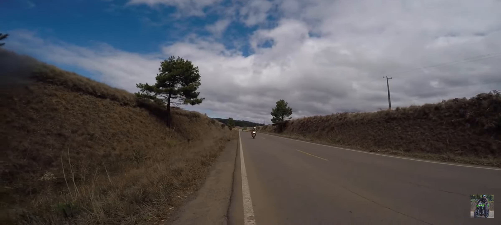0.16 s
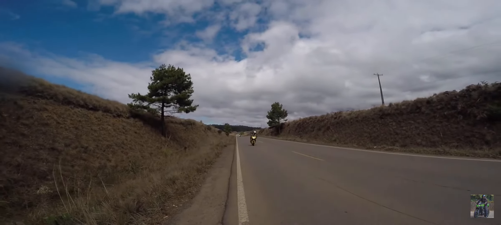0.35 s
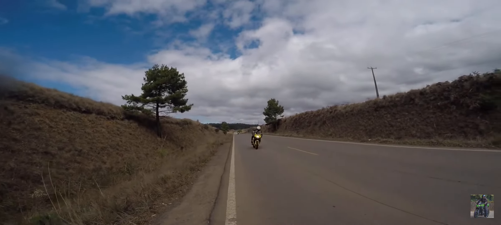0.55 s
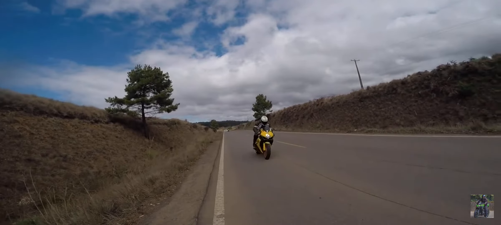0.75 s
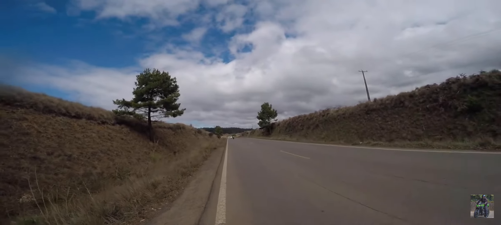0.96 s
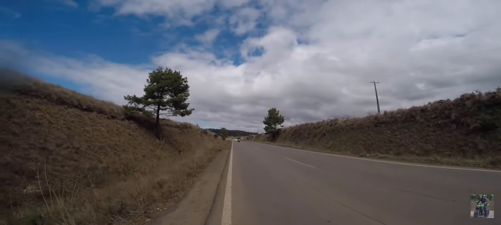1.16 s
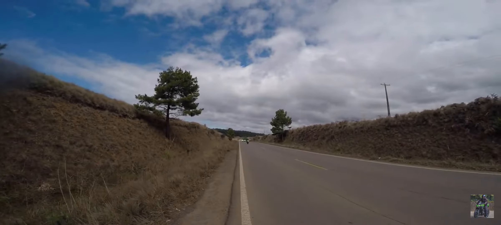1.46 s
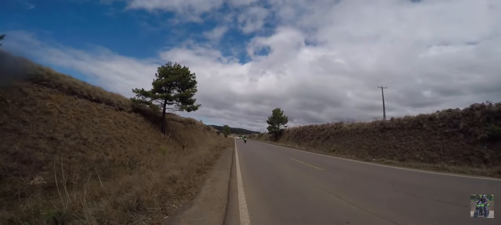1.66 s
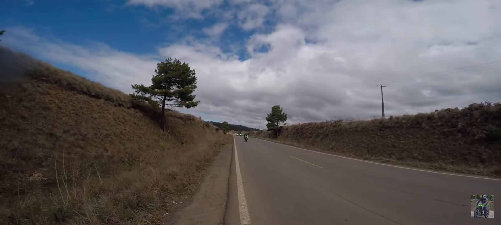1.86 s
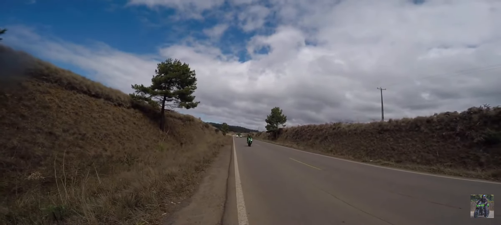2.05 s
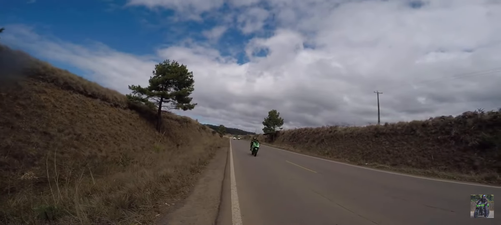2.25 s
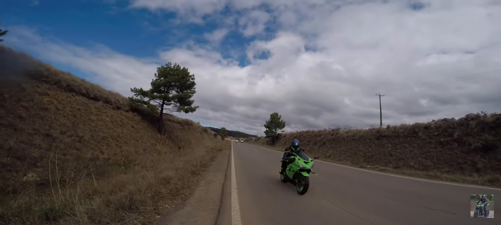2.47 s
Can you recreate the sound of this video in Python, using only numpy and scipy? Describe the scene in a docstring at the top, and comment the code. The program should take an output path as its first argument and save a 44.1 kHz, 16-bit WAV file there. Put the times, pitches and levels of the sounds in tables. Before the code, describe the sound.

A high-revving sport motorcycle approaches over light wind and faint low hum, swelling to a hard bark as it passes very close at 1 s. Its pitch drops and its wake buffets the microphone until about 1.3 s. It drones away, with a tiny tick near 1.6 s, its note falling around 2.3 s. A second motorcycle screams closer, cut off on arrival at 2.6 s. Right side dominates; left is dull.

```python
"""A first sport motorcycle nears on an open country road amid wind and a faint low hum, and barks by at 1 s.
Its wake rumbles on the microphones; it drones away, a tiny tick sounds, and its note drops near the end.
Meanwhile a second one screams up behind, rising in pitch and level until the sound ends as it arrives.
Each machine sums multiples of its crank speed with puffing noise, shaped by distance, angle and Doppler.
The right channel rides a gain control; the left is quiet and dull."""
import sys
import numpy as np
from scipy import signal
from scipy.fft import rfft, irfft
from scipy.io import wavfile

SR = 44100
rng = np.random.default_rng(int(sys.argv[2]) if len(sys.argv) > 2 else 0)


def pcm_store(signal):
    """Save signal as 16-bit PCM."""
    levels = np.round(np.clip(np.atleast_2d(signal), -1, 1) * 32767)
    wavfile.write(sys.argv[1], SR, levels.astype(np.int16).T)


N = 115101
T = np.arange(N) / SR
HZ = np.maximum(np.fft.rfftfreq(N, 1 / SR), 1)
SOUND_M_PER_S = 343


def from_db(db):
    """Decibels to gain."""
    return 10 ** (np.asarray(db) / 20)


def colour(hz, db):
    """Gain at every frequency, interpolated in dB over log frequency."""
    return from_db(np.interp(np.log(HZ), np.log(hz), db))


def noise(hz, db_per_hz):
    """Gaussian noise with the given level per Hz."""
    shaped = irfft(rfft(rng.standard_normal(N)) * colour(hz, db_per_hz), N)
    return shaped * np.sqrt(SR / 2)


def drift(rate_hz):
    """Slow random wander with zero mean and unit spread."""
    slow = irfft(rfft(rng.standard_normal(N)) / (1 + (HZ / rate_hz) ** 2), N)
    return (slow - slow.mean()) / slow.std()


def smooth(x, seconds):
    """One-pole smoothing."""
    pole = np.exp(-1 / (seconds * SR))
    return signal.lfilter([1 - pole], [1, -pole], x)


def bump(centre_s, half_width_s):
    """Gaussian bell of height 1 in time, down to 1/e at the half width."""
    return np.exp(-((T - centre_s) / half_width_s) ** 2)


def hum():
    """Faint low tones whose phases waver slowly."""
    # Each row: frequency in Hz, RMS level in dB.
    hum_tones = [(30, -71), (60, -62), (120, -66)]
    total = 0
    for hz, db in hum_tones:
        phase = 2 * np.pi * hz * T + 0.34 * drift(2.2)
        total = total + np.sqrt(2) * from_db(db) * np.sin(phase)
    return total


def wind():
    """Steady air noise plus gusts of low-passed noise; the strongest is the first machine's wake."""
    # Each row: frequency in Hz, level in dB per Hz.
    wind_spectrum = [(20, -76.5), (60, -80.5), (130, -79), (250, -85), (500, -83), (800, -90.5),
                     (1500, -103), (2300, -109), (3200, -109), (4000, -115), (5000, -115), (6500, -123),
                     (10000, -133), (13000, -145)]
    # Each row: centre in seconds, level of the low-passed noise in dB over the wind, half width in seconds.
    gusts = [(.14, -3.5, .08), (.5, 4.5, 0.038), (1.01, 18, .045), (1.17, 11, 0.17), (2.15, 4, .2)]
    gust_top_hz = 104
    hz, db_per_hz = np.transpose(wind_spectrum)
    air = noise(hz, db_per_hz)
    lowpass = signal.butter(2, gust_top_hz, fs=SR, output="sos")
    rumble = signal.sosfilt(lowpass, noise(hz, db_per_hz))
    gust_gain = sum(from_db(db) * bump(centre_s, width_s) for centre_s, db, width_s in gusts)
    return air + rumble * gust_gain


def tick():
    """A tiny bright tick: band-passed noise with an abrupt start and exponential decay."""
    start_s, decay_s = 1.577, .0012
    level_before_filter_db = -62
    envelope = (T > start_s) * np.exp(-np.abs(T - start_s) / decay_s)
    burst = rng.standard_normal(N) * envelope
    band = signal.butter(2, [5500, 10500], "band", fs=SR, output="sos")
    return from_db(level_before_filter_db) * signal.sosfilt(band, burst)


def path(abreast_s, speed_m_per_s, closest_m):
    """Distance (m), angle from the nose (deg) and Doppler ratio of a straight steady pass, as heard."""
    sent_s = np.linspace(-4, 4, 8001)
    extra_m = np.hypot(speed_m_per_s * sent_s, closest_m) - closest_m
    heard_s = sent_s + extra_m / SOUND_M_PER_S
    along_m = speed_m_per_s * np.interp(T - abreast_s, heard_s, sent_s)
    distance_m = np.hypot(along_m, closest_m)
    angle_deg = np.degrees(np.arccos(-along_m / distance_m))
    receding_m_per_s = speed_m_per_s * along_m / distance_m
    return distance_m, angle_deg, 1 / (1 + receding_m_per_s / SOUND_M_PER_S)


def exhaust_note(turn_rad, facing, orders, fades, waver_db, smear_rad, sweep_rad):
    """Cosines at every multiple of crank speed, each with its own directivity, waver and fades."""
    multiples, *views_db = np.transpose(orders)
    multiples = np.round(multiples)
    note = 0
    for k in range(1, int(multiples[-1]) + 1):
        db = np.array([np.interp(k, multiples, view) for view in views_db]) @ facing
        db = db + waver_db * drift(6.3)
        for centre_s, multiple, change_db, width_s in fades:
            if round(multiple) == k:
                db = db + change_db * bump(centre_s, width_s)
        phase = k * turn_rad - smear_rad * np.log(k) + sweep_rad * max(k - 6, 0) ** 2
        note = note + np.sqrt(2) * from_db(db) * np.cos(phase)
    return note


def roar(turn_rad, facing, distance_m, spectrum, chop, roar_db, hiss_db):
    """Gas, tyre and air noise puffing twice per crank turn, strong and weak; its top fades faster afar."""
    hiss_above_hz, hiss_loss_db_per_m = 3060, .5
    hz, *views_db = np.transpose(spectrum)
    rush = sum(np.sqrt(share) * noise(hz, view) for share, view in zip(facing, views_db))
    hiss = irfft(rfft(rush) / (1 + (hiss_above_hz / HZ) ** 4), N)
    hiss_gain = from_db(hiss_db - hiss_loss_db_per_m * distance_m)
    rush = rush + hiss * (hiss_gain - 1)
    puffs = np.exp(chop * (np.cos(2 * turn_rad) + np.cos(turn_rad) / 2))
    return from_db(roar_db) * rush * puffs / np.sqrt(np.mean(puffs ** 2))


def motorcycle(route, drive, angles_deg, orders, roar_spectrum, fades, jitter_rad, shake, waver_db,
               smear_rad, sweep_rad, chop, roar_db, hiss_db):
    """Exhaust note and roar locked to one Doppler-shifted crank angle, falling off as 1/distance."""
    distance_m, angle_deg, doppler = route
    s, crank_hz, level_db = np.transpose(drive)
    heard_hz = np.interp(T, s, crank_hz) * doppler
    turn_rad = 2 * np.pi * np.cumsum(heard_hz) / SR + jitter_rad * drift(60)
    # share of each described direction in the present view
    facing = np.array([np.interp(angle_deg, angles_deg, row) for row in np.eye(len(angles_deg))])
    note = exhaust_note(turn_rad, facing, orders, fades, waver_db, smear_rad, sweep_rad)
    note = note * (1 + shake * drift(70))
    rush = roar(turn_rad, facing, distance_m, roar_spectrum, chop, roar_db, hiss_db)
    return from_db(np.interp(T, s, level_db)) * (note + rush) / distance_m


def second_motorcycle():
    """The pursuer: crank speed and level climb as it closes in, its treble stronger."""
    # Each row: time in seconds, crank speed in Hz, level of the whole machine in dB.
    drive = [(0, 85.4, -30.5), (1.2, 90.3, -19), (1.45, 90.9, -13.5), (1.621, 94.25, -14),
             (1.73, 95.72, -8), (1.901, 98.06, -3.5), (1.999, 99.3, -4), (2.201, 101.9, -0.5),
             (2.33, 103.8, 2.5), (2.46, 105.5, 1), (2.55, 105.4, -2), (2.61, 107.6, -3)]
    # Each row: multiple of crank speed, then dB at 1 m from each angle, before the drive level.
    orders = [(1, -40, -60.5), (2, -32, -39), (3, -43, -55.5), (4, -7.5, -13), (5, -40.5, -34),
              (6, -34, -53), (7, -41.5, -45), (8, -18, -21.5), (9, -40, -39.5), (10, -23, -32),
              (11, -52.5, -38.5), (12, -41, -32), (13, -44, -47), (14, -37.5, -55), (15, -46, -48),
              (16, -37.5, -44), (18, -48, -52), (20, -60, -77), (23, -45, -55), (27, -50.5, -55.5),
              (31, -57, -58), (33, -50, -55), (36, -67.5, -56.5), (42, -57, -55), (48, -65.5, -67)]
    # Each row: frequency in Hz, then dB per Hz at 1 m from each angle, before drive, roar and hiss gains.
    roar_spectrum = [(60, -50.5, -53.5), (250, -54, -62.5), (795, -65.5, -57.5), (1550, -72.5, -59.5),
                     (2280, -77.5, -67.5), (3160, -68, -77.5), (3900, -72, -73.5), (4900, -73, -73.5),
                     (6500, -81.5, -84.5), (10000, -87.5, -96), (13000, -106, -100)]
    # Each row: centre in seconds, multiple of crank speed, change in dB, half width in seconds.
    fades = [(2.262, 24, 11.5, 0.049), (2.12, 10, 2, 0.072), (2.4, 16, -8, .12), (2.36, 10, -5.5, 0.13),
             (2.37, 29, 16, 0.034), (2.38, 8, -6, .035), (2.48, 8, 8, 0.044), (2.52, 12, 11, 0.022),
             (2.545, 8, -14, 0.0094), (2.527, 4, -18, .02)]
    route = path(abreast_s=2.635, speed_m_per_s=33.0, closest_m=1.7)
    return motorcycle(route, drive, (9.1, 44.5), orders, roar_spectrum, fades,
                      jitter_rad=.004, shake=0.018, waver_db=1.8, smear_rad=0.72, sweep_rad=.4,
                      chop=0.067, roar_db=-2.0, hiss_db=3.5)


def first_motorcycle():
    """The leader: steady road speed past the microphones, crank speed falling near the end."""
    # Each row: time in seconds, crank speed in Hz, level of the whole machine in dB.
    drive = [(0, 88.2, -7), (.28, 89.32, -4), (.42, 89.74, -3), (.7, 90.7, 1.5), (.9, 91.06, 0.5),
             (.995, 90.45, -0.5), (1.05, 90.96, -5.5), (1.13, 90.8, -2), (1.3, 91.1, -1),
             (1.451, 90.77, 1.5), (1.699, 91.15, -1), (2.1, 91.42, -1), (2.21, 93.42, -1.5),
             (2.299, 90.7, 2.5), (2.39, 82.46, -1.5), (2.61, 82.4, -16)]
    # Each row: multiple of crank speed, then dB at 1 m from each angle, before the drive level.
    orders = [(1, -30, -34, -33), (2, -13.5, -10.5, -14), (3, -34.5, -42, -44.5), (4, -19.5, -29, -24),
              (5, -25, -40.5, -34), (6, -22.5, -18.5, -28), (7, -31.5, -38, -43), (8, -21.5, -16, -35.5),
              (9, -34, -38, -54), (10, -31.5, -30, -42.5), (11, -39.5, -38, -53), (12, -36.5, -35, -47),
              (13, -52.5, -46, -56), (14, -44.5, -38.5, -45), (16, -61, -46.5, -63.5), (18, -55, -48, -60),
              (21, -58.5, -53.5, -70.5)]
    # Each row: frequency in Hz, then dB per Hz at 1 m from each angle, before drive, roar and hiss gains.
    roar_spectrum = [(60, -53.5, -59, -63), (253, -61, -57, -56), (830, -58.5, -56, -75.5),
                     (1070, -60.5, -52, -71), (1450, -71.5, -62, -81.5), (2130, -74, -67.5, -81.5),
                     (2270, -83, -71.5, -86.5), (3230, -74.5, -82, -89), (3900, -85, -75.5, -90),
                     (4800, -81.5, -80, -98.5), (6300, -96, -91, -103), (10200, -102, -102, -114),
                     (13000, -118, -120, -125)]
    # Each row: centre in seconds, multiple of crank speed, change in dB, half width in seconds.
    fades = [(.925, 8, -26, .02), (.92, 14, 10, 0.036), (.995, 6, 4, 0.027), (0.46, 11, 8.5, 0.13),
             (1.07, 8, 9, 0.026)]
    route = path(abreast_s=1.012, speed_m_per_s=30.5, closest_m=1.481)
    return motorcycle(route, drive, (19, 78, 145), orders, roar_spectrum, fades,
                      jitter_rad=.009, shake=0.035, waver_db=1.04, smear_rad=0.58, sweep_rad=.5,
                      chop=0.17, roar_db=1.0, hiss_db=5.5)


def scene():
    """All sources at two closely spaced microphones, the left one later and duller."""
    # Each row: frequency in Hz, left gain relative to right in dB.
    left_colour = [(60, 0), (250, -3), (460, -6), (760, -9), (1260, -13), (2100, -12.5), (3500, -19.5),
                   (6000, -15), (12000, -14.5)]
    left_lag_s = .00008
    right = hum() + wind() + tick() + second_motorcycle() + first_motorcycle()
    delay = np.exp(-2j * np.pi * HZ * left_lag_s)
    response = irfft(colour(*np.transpose(left_colour)) * delay, N)
    left = signal.fftconvolve(right, np.roll(response, 256)[:513], "same")
    return np.array([left, right])


def record(dry):
    """Left gains faint hiss; right is turned up, ducks when loud, recovers slowly; the top is cut."""
    max_gain_db, target_db = 33, -11.5
    detect_s, attack_s, release_s = 0.029, 0.0027, 0.71
    look_ahead_s = .009
    left_hiss_db, cutoff_hz, fade_in_s = -71, 13500, .004
    left, right = dry
    level_db = 10 * np.log10(smooth(right ** 2, detect_s) + 1e-12)
    excess_db = np.maximum(level_db + max_gain_db - target_db, 1e-3)
    # hold peaks of the excess, then let them decay exponentially
    held_db = np.exp(np.maximum.accumulate(np.log(excess_db) + T / release_s) - T / release_s)
    cut_db = np.interp(T + look_ahead_s, T, smooth(held_db, attack_s))
    right = right * from_db(max_gain_db - cut_db)
    right = right / (1 + (right / .95) ** 8) ** (1 / 8)  # soft limit
    left = left + from_db(left_hiss_db) * rng.standard_normal(N)
    stereo = np.minimum(T / fade_in_s, 1) * np.array([left, right])
    lowpass = signal.cheby2(12, 70, cutoff_hz, fs=SR, output="sos")
    return signal.sosfilt(lowpass, stereo)


dry = scene()
out = record(dry)
pcm_store(out)
```